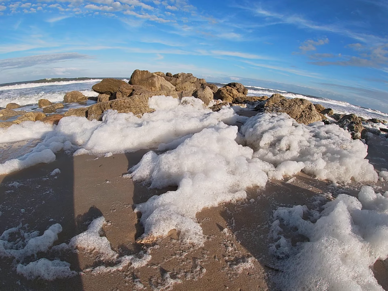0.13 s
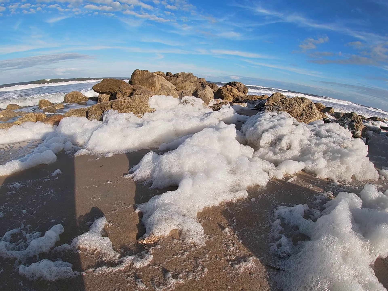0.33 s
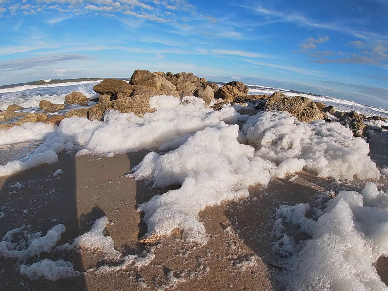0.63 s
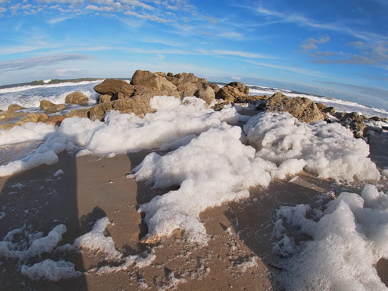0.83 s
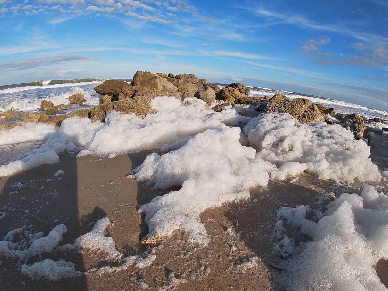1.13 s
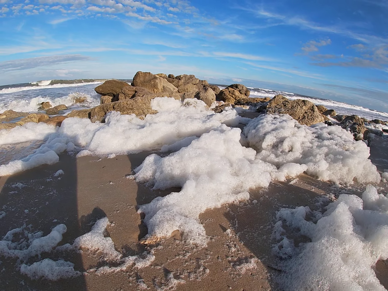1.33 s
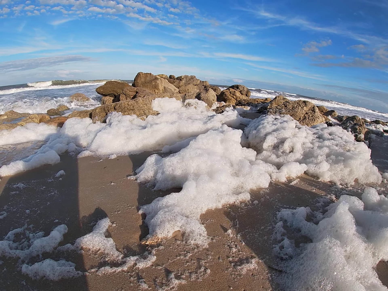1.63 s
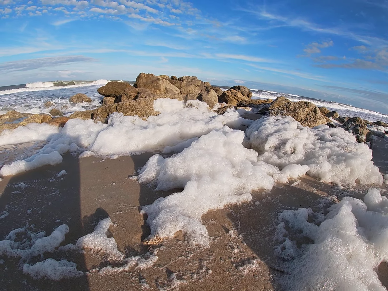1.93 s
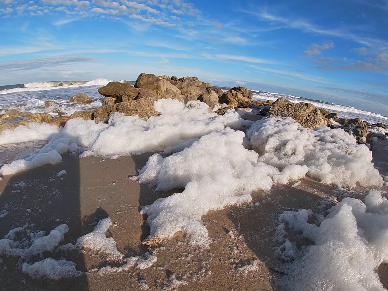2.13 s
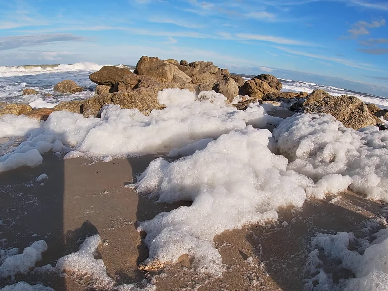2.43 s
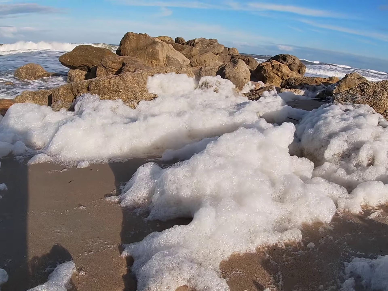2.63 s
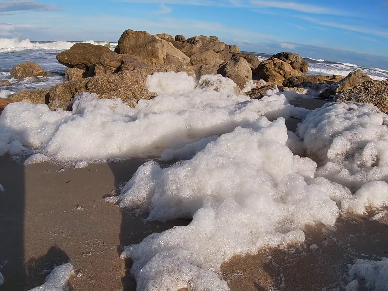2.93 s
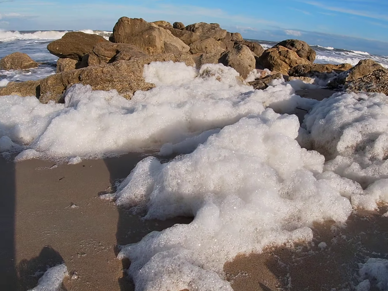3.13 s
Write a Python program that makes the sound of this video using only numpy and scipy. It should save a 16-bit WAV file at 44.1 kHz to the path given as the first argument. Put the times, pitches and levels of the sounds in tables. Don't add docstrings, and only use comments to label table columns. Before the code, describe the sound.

Wind rumbles and flutters against a small camera microphone on an open beach, while quieter surf washes over rocks and foam fizzes; a gust with water slaps comes midway, and the hardest thumps near the end.

```python
import sys
import numpy as np
from scipy import signal
from scipy.fft import rfft, irfft
from scipy.io import wavfile
from scipy.ndimage import uniform_filter1d, map_coordinates

SR = 44100
rng = np.random.default_rng(int(sys.argv[2]) if len(sys.argv) > 2 else 0)


def magnitude_from_level(level_db):
    exponent = np.asarray(level_db, float) / 20
    return 10 ** exponent


def master(y):
    cut = np.clip(np.atleast_2d(y).T, -1, 1)
    pcm = np.round(cut * 32767)
    wavfile.write(sys.argv[1], SR, pcm.astype(np.int16))


N = 144648

# time in seconds, level in dB, speed in octaves above the mean.
WIND_GUSTS = [(.04, -23, -.3), (.15, -21, 0.025), (.27, -25, -0.053), (.6, -19.5, -0.025),
              (.73, -23.5, -0.084), (1.15, -24.5, -0.096), (1.35, -16, -0.27), (1.49, -14.5, 0.11),
              (1.53, -20.5, -0.15), (1.72, -24, -0.098), (1.85, -19.5, -0.011), (2.08, -18.5, 0.062),
              (2.16, -28.5, .35), (2.33, -19, -0.02), (2.75, -21, 0.047), (2.97, -19.5, 0.078),
              (3.08, -19.5, 0.15), (3.28, -19.5, 0.14)]
# frequency in Hz, density in dB per Hz.
AIR_SPECTRUM = [(12, -16.5), (28, -4.5), (65, 0), (125, -3), (220, -12.5), (350, -26.5), (600, -35),
                (1500, -59)]
# time in seconds, level in dB.
BREAKER_LEVEL = [(0, -42), (.4, -42), (.7, -42.5), (1.0, -39.5), (1.15, -42.5), (1.33, -38), (1.43, -43.5),
                 (1.7, -46), (2.0, -46.5), (2.13, -52.5), (2.5, -48.5), (2.8, -47), (3.05, -46),
                 (3.28, -51)]
# frequency in Hz, density in dB per Hz.
WASH_SPECTRUM = [(300, 6), (700, -4), (1000, -1.5), (1500, -0.5), (1950, -2), (2450, -13.5), (3200, -39)]
# time in seconds, level in dB.
FOAM_LEVEL = [(0, -46), (.4, -44), (.85, -41.5), (1.2, -40.5), (1.35, -40.5), (1.55, -46), (2.0, -46.5),
              (2.2, -46), (2.4, -44.5), (2.6, -45.5), (2.8, -45.5), (3.28, -46.5)]
# frequency in Hz, density in dB per Hz.
FIZZ_SPECTRUM = [(1500, -10), (2400, -5), (2900, 1.5), (3600, -1.5), (4900, -5), (5600, -11.5),
                 (6700, -30.5), (7600, -39.5)]
# time in seconds, level in dB.
SPRAY_LEVEL = [(0, -81.5), (.25, -77.5), (.45, -75.5), (.85, -74), (1.3, -75.8), (1.42, -79), (1.5, -82.5),
               (2.3, -84.5), (3.28, -85)]
# frequency in Hz, density in dB per Hz.
SPRAY_SPECTRUM = [(6500, -7), (7200, -10), (7700, -6.5), (8800, -3.5), (9600, -5.5), (11000, -13),
                  (12800, -23)]
# centre in seconds, level in dB, pitch in Hz.
PUFF_EVENTS = [(0.057, -20.5, 212), (0.102, -13.5, 111), (.11, -32, 500), (.178, -17, 204), (.19, -29, 526),
               (.25, -20.5, 200), (0.353, -19.5, 153), (.414, -31, 500), (.48, -24.5, 362),
               (.572, -20, 280), (.601, -19, 134.3), (0.614, -14.5, 129.4), (0.952, -33, 500),
               (1.037, -25, 380.2), (1.09, -29, 550), (1.226, -30, 400), (1.294, -30.5, 326),
               (1.396, -23.5, 403), (1.459, -23, 132), (1.4755, -15, 947), (1.504, -19, 257.2),
               (1.843, -31, 500), (1.952, -28, 385), (1.969, -23.5, 293.9), (2.03, -25.5, 409.7),
               (2.078, -18.5, 227), (2.171, -24, 317), (2.2, -23, 300), (2.318, -27, 379.6),
               (2.338, -19, 232.3), (2.352, -17.5, 127), (2.381, -27, 452.6), (2.428, -25, 316.1),
               (2.486, -18, 260), (2.517, -27.5, 368.6), (2.552, -18, 180), (2.59, -23, 377),
               (2.612, -16, 130), (2.655, -21, 293.7), (2.79, -26, 392.1), (2.939, -31, 269),
               (3.009, -24.5, 575), (3.054, -8.5, 162), (3.075, -19.5, 310), (3.102, -12.5, 117),
               (3.135, -39, 547), (3.171, -18, 215), (3.186, -26.5, 545), (3.199, -37, 600),
               (3.267, -26, 372), (0.431, -17.5, 110), (.542, -16, 178), (1.24, -22.5, 258),
               (1.345, -25, 250), (1.378, -15, 227), (1.625, -16, 141), (2.71, -29, 258),
               (3.018, -13, 149.7)]
# centre in seconds, level in dB, pitch in Hz, length in cycles.
EDDY_EVENTS = [(0.142, -17, 255, 0.52), (0.165, -23.5, 264, 0.87), (0.549, -24, 211, 0.69),
               (0.606, -24.5, 240.3, 0.75), (0.789, -16, 173, 0.93), (1.386, -13, 207, 1.5),
               (1.435, -19, 227, 3), (1.4755, -11, 380, 1.8), (1.657, -12.5, 115, 1.7),
               (1.899, -14.5, 213, 3.7), (2.062, -15.5, 253, 1), (2.22, -21.5, 294, 0.51),
               (2.365, -26.5, 298.4, 2.3), (2.569, -21, 233.2, 5.1), (2.822, -26.5, 302, 2.7),
               (3.011, -8, 122, 1.9), (3.022, -15, 368, 1.13), (3.041, -14, 147, 1),
               (3.086, -15.5, 196, 1.4), (2.917, -20.5, 256, 1.6), (3.0561, -7, 505, 0.64),
               (3.073, -10, 190, 1.5), (3.112, -11, 239, 0.71), (3.25, -22, 339.9, 1.1)]
# centre in seconds, level in dB.
GRAIN_TICKS = [
    (1.04, -64),
    (1.343, -61),
    (1.415, -63),
    (3.098, -53),
    (3.103, -63),
    (3.1085, -57),
    (3.114, -60),
]
# peak in seconds, level in dB, centre in Hz, decay time in seconds.
SLAP_EVENTS = [(1.325, -32.5, 910, 0.017), (1.331, -35, 3840, 0.0053), (1.349, -40, 2400, 0.0062),
               (1.382, -27, 1150, 0.024), (1.385, -39, 2570, 0.0063), (1.957, -40.5, 3850, 0.0058),
               (1.992, -40, 1100, 0.0085), (2.555, -38, 1010, 0.0034), (2.817, -38.5, 997.5, 0.012),
               (2.911, -37, 1190, 0.012), (3.025, -37, 1910, 0.0037), (1.305, -41, 3698, .006),
               (1.356, -39, 3300, 0.0065), (1.354, -38, 1500, 0.0086), (1.389, -41, 3850, 0.0068),
               (1.27, -37, 1900, .01)]
# time in seconds, level in dB.
RUNUP_LEVEL = [(0, -56.5), (2.1, -64), (2.3, -47), (2.55, -46), (2.85, -45), (3.05, -43.5), (3.28, -47)]
# frequency in Hz, density in dB per Hz.
SHEET_SPECTRUM = [(1000, -12.5), (1500, -7.5), (1850, -2), (2200, -3.5), (2700, -9.5), (3300, -16)]


def curve(table, col=1):
    a = np.array(table, float)
    return np.interp(np.arange(N) / SR, a[:, 0], a[:, col])


def walk(hz):
    hold = int(SR / hz)
    steps = np.repeat(rng.standard_normal(400)[:N // hold + 1], hold)
    return 1.46 * uniform_filter1d(uniform_filter1d(steps, hold), hold)[:N]


def spectral_gain(spectrum, f, below_db):
    a = np.array(spectrum, float)
    return magnitude_from_level(np.interp(np.log(f), np.log(a[:, 0]), a[:, 1], left=below_db, right=-120))


def water_noise(spectrum, shared_db, own_db, own_hz):
    f = np.fft.rfftfreq(N, 1 / SR) + 1e-3
    spec = rfft(rng.standard_normal(N)) * spectral_gain(spectrum, f, -120)
    swell = walk(3.6)
    out = np.zeros(N)
    for third in np.arange(24, 43):
        part = np.clip(1 - np.abs(3 * np.log2(f) - third), 0, 1)
        out += irfft(spec * part, N) * magnitude_from_level(shared_db * swell + own_db * walk(own_hz))
    return out / np.std(out)


def wavelet(s, db, hz, cycles):
    out = np.zeros(N)
    reach = 2 * cycles / hz * SR
    near = np.arange(max(int(s * SR - reach), 0), min(int(s * SR + reach), N))
    u = (near / SR - s) * hz
    swing = np.sin(2 * np.pi * (u + rng.random()))
    out[near] = magnitude_from_level(db) * swing * np.exp(-(2 * u / cycles) ** 2)
    return out


def wind():
    f = np.fft.rfftfreq(2 * N, 1 / SR) + 1e-3
    air = irfft(rfft(rng.standard_normal(2 * N)) * spectral_gain(AIR_SPECTRUM, f, -60))
    swirl_oct, swirl_hz = 0.112, 60.26
    swirl = swirl_oct * 1.526 * np.tanh(walk(swirl_hz) / 1.42)
    travel = np.cumsum(2 ** (curve(WIND_GUSTS, col=2) + swirl))
    swept = map_coordinates(air / np.std(air), [travel], order=1, mode="mirror")
    even_s, even_share = 0.071, 0.69
    swept = swept / uniform_filter1d(swept ** 2, int(even_s * SR)) ** (even_share / 2)
    flutter_db, flutter_hz = 0.94, 30.01
    return swept * magnitude_from_level(curve(WIND_GUSTS) + flutter_db * walk(flutter_hz) + 6.2 * swirl)


def breakers():
    return water_noise(WASH_SPECTRUM, 0.4, 1.0, 8.4) * magnitude_from_level(curve(BREAKER_LEVEL) + 3.0)


def foam():
    return water_noise(FIZZ_SPECTRUM, 0.31, 1.0, 20.0) * magnitude_from_level(curve(FOAM_LEVEL) + 0.23)


def spray():
    return water_noise(SPRAY_SPECTRUM, 0.8, 1.5, 20.0) * magnitude_from_level(curve(SPRAY_LEVEL))


def puff(s, db, hz):
    return wavelet(s, db, hz, cycles=1.7)


def eddy(s, db, hz, cycles):
    core_db, core_ratio = -7.5, 2.1
    return wavelet(s, db, hz, cycles) + wavelet(s, db + core_db, hz * core_ratio, 0.9)


def grain_tick(s, db):
    return wavelet(s, db, hz=7800.0, cycles=3.1)


def slap(s, db, hz, length):
    t = (np.arange(N) / SR - s) / length
    half_width_hz = 516
    band = [hz - half_width_hz, hz + half_width_hz]
    sos = signal.butter(3, band, "bandpass", fs=SR, output="sos")
    rush = signal.sosfilt(sos, rng.standard_normal(N))
    return magnitude_from_level(db) * np.exp(np.where(t < 0, 1.8 * t, -t)) * rush / np.std(rush)


def runup():
    return water_noise(SHEET_SPECTRUM, 0.61, 0.65, 31.0) * magnitude_from_level(curve(RUNUP_LEVEL))


def scene():
    air = wind() + sum(puff(*p) for p in PUFF_EVENTS) + sum(eddy(*e) for e in EDDY_EVENTS)
    water = breakers() + foam() + spray() + sum(slap(*s) for s in SLAP_EVENTS) + runup()
    sand = sum(grain_tick(*g) for g in GRAIN_TICKS)
    return (air + water + sand)[None]


def low_pass(x):
    return signal.sosfilt(signal.butter(12, 12750, fs=SR, output="sos"), x)


def record(dry):
    rounded = np.tanh(1.7 * dry) / 1.7
    fade = np.clip(np.arange(N, 0, -1) / 200, 0, 1)
    return low_pass(rounded * fade)


dry = scene()
out = record(dry)
master(out)
```